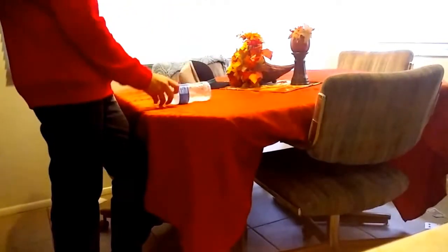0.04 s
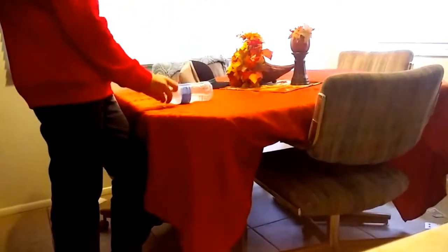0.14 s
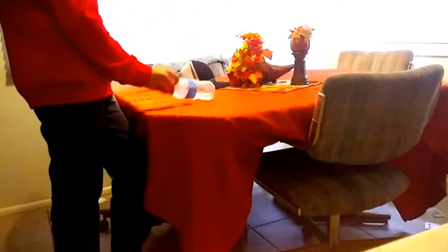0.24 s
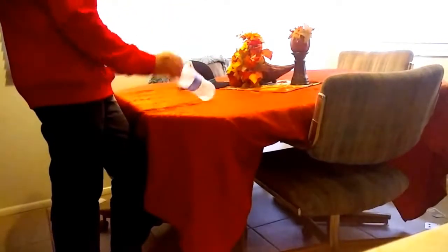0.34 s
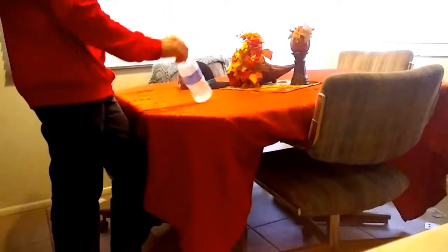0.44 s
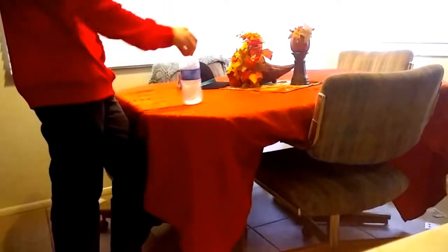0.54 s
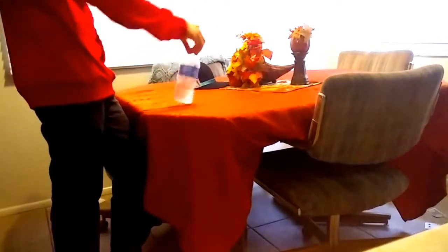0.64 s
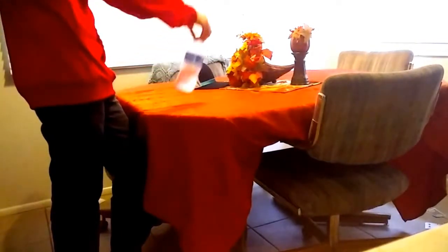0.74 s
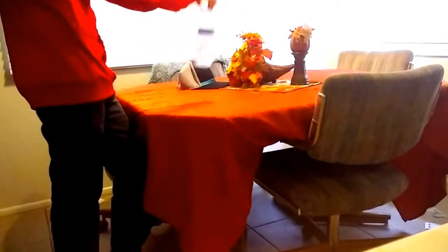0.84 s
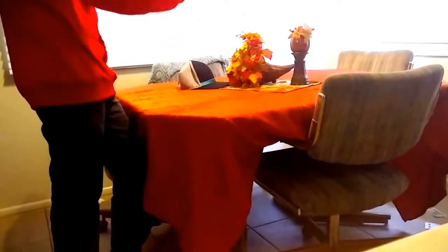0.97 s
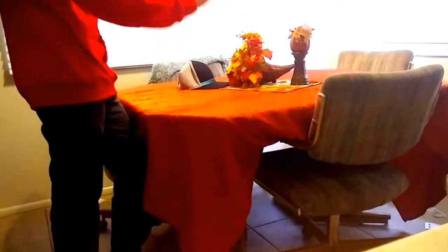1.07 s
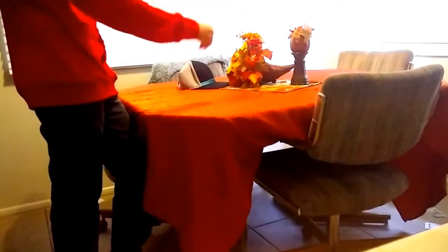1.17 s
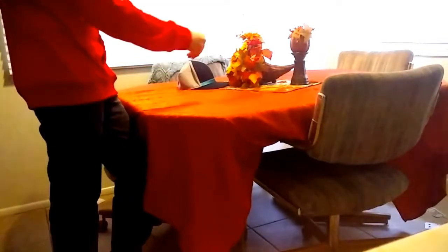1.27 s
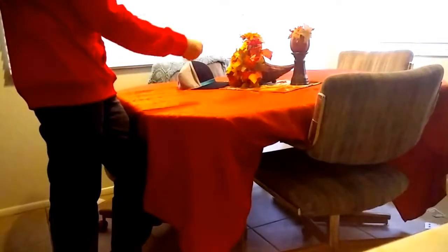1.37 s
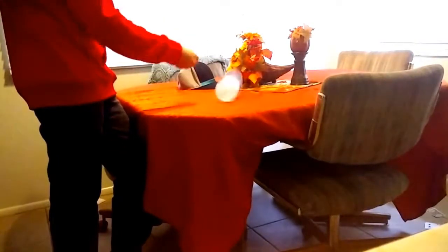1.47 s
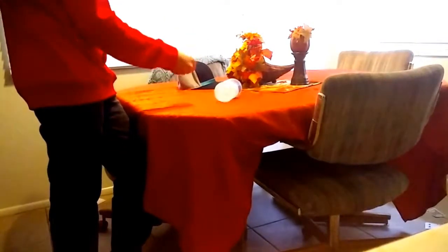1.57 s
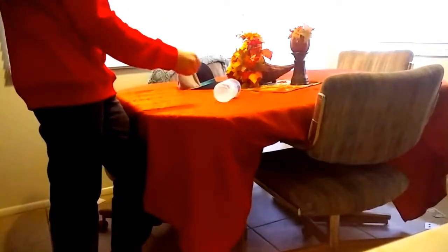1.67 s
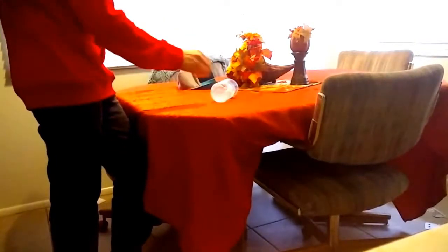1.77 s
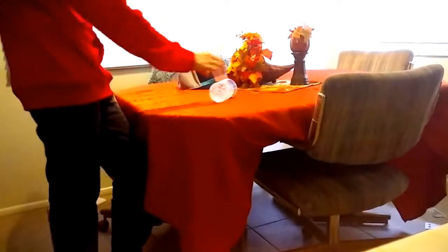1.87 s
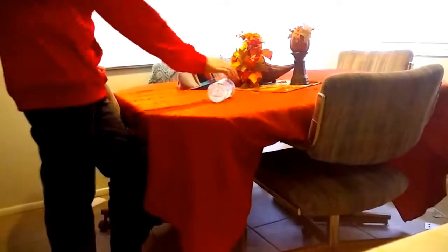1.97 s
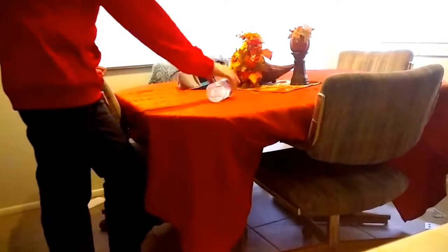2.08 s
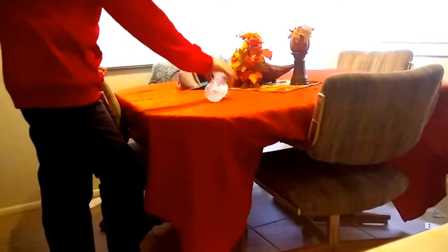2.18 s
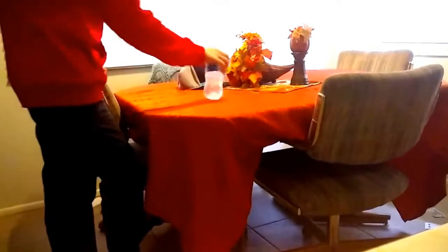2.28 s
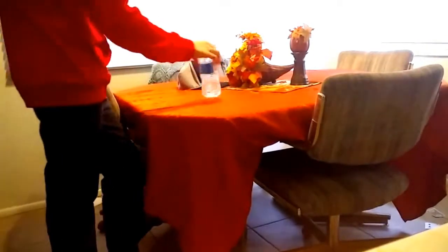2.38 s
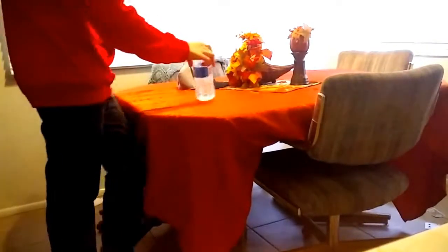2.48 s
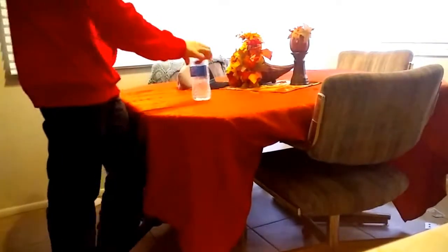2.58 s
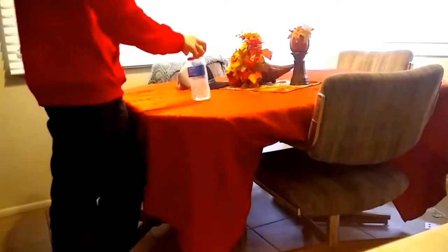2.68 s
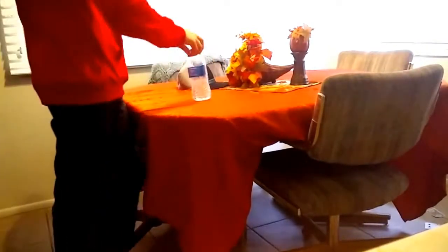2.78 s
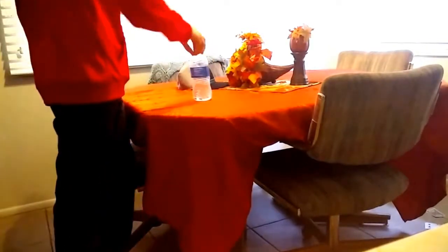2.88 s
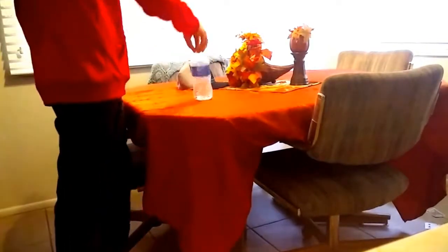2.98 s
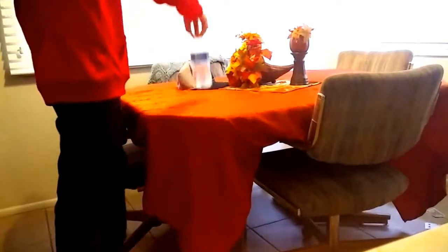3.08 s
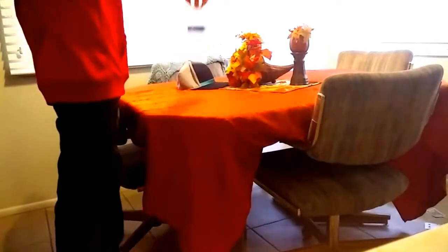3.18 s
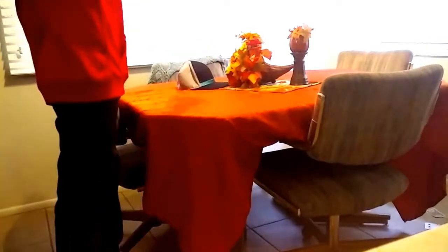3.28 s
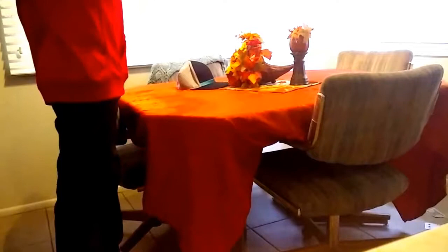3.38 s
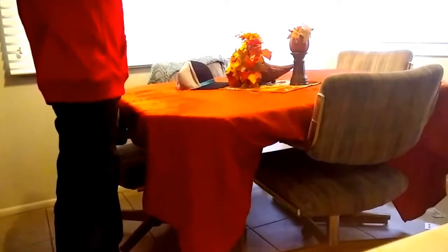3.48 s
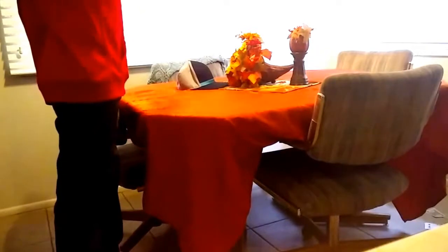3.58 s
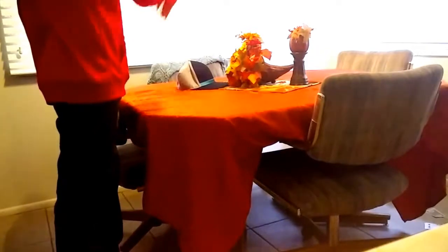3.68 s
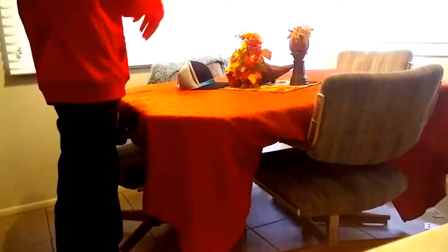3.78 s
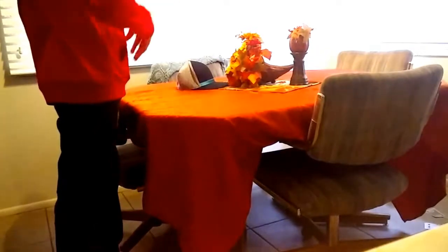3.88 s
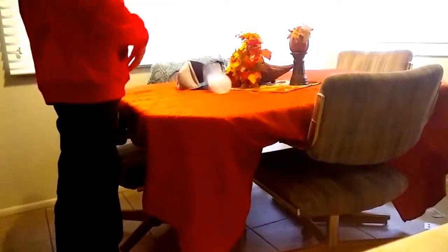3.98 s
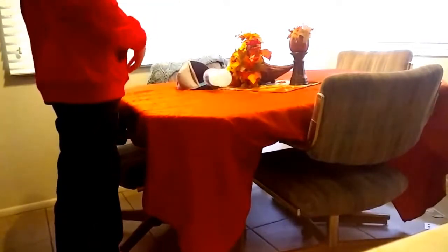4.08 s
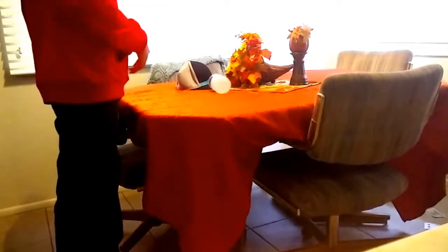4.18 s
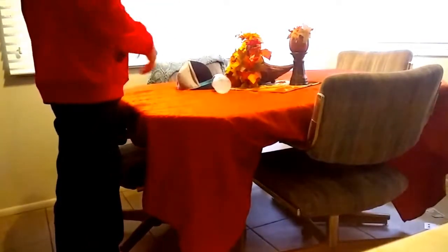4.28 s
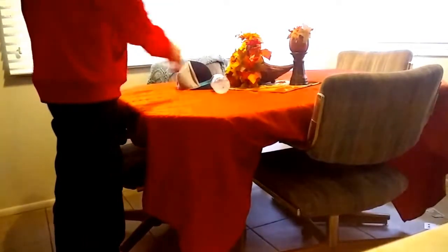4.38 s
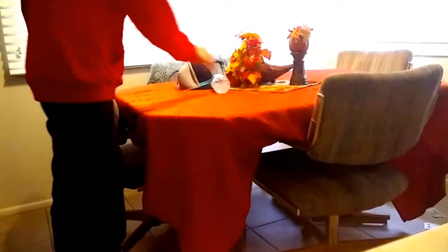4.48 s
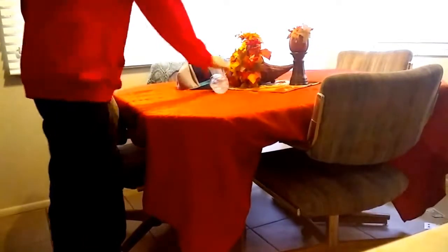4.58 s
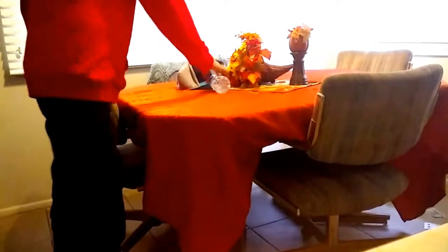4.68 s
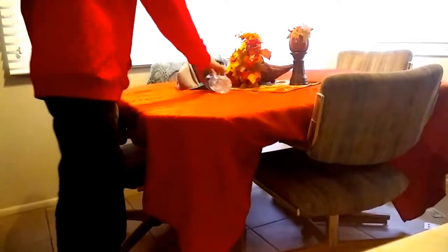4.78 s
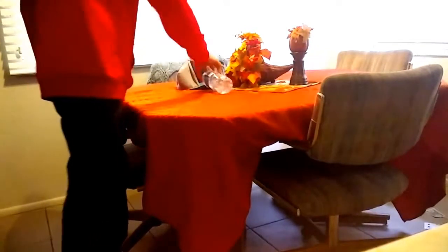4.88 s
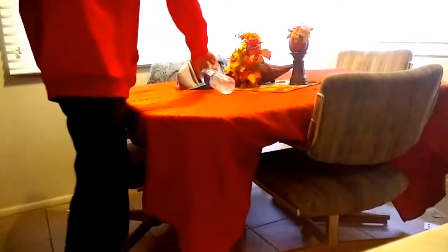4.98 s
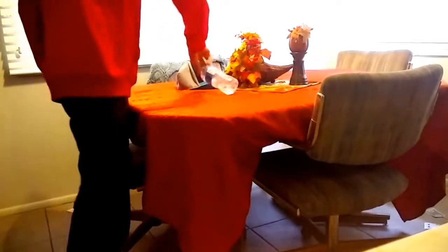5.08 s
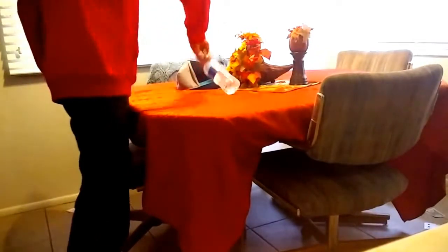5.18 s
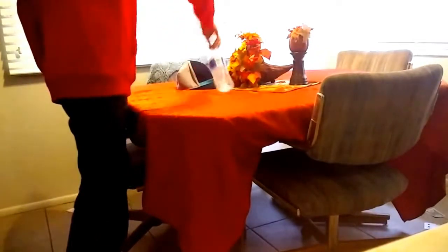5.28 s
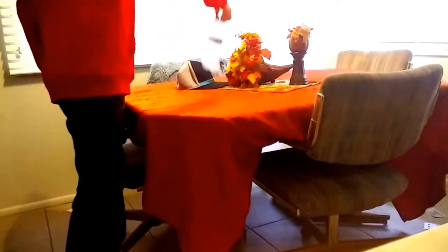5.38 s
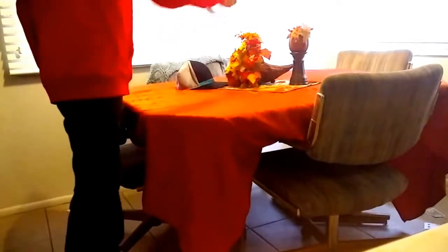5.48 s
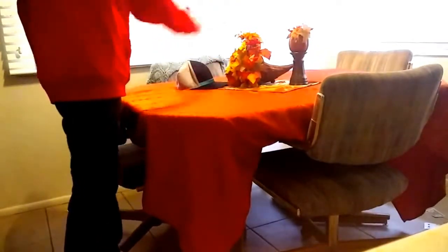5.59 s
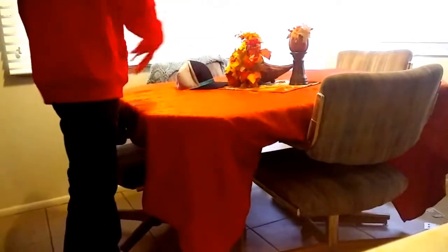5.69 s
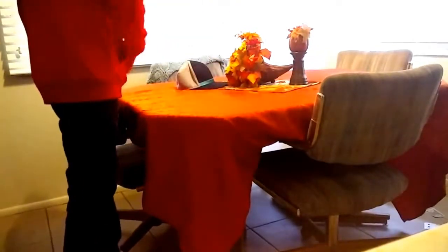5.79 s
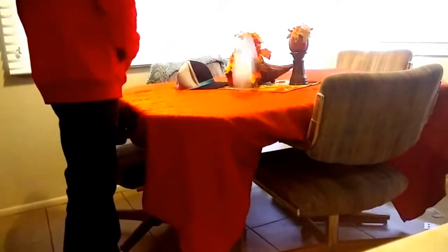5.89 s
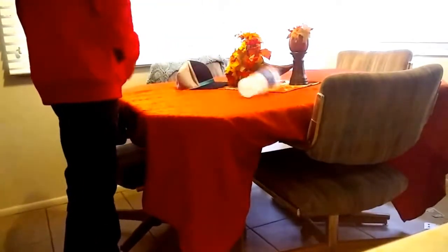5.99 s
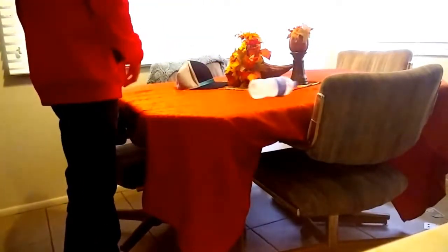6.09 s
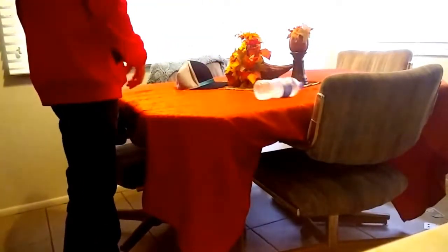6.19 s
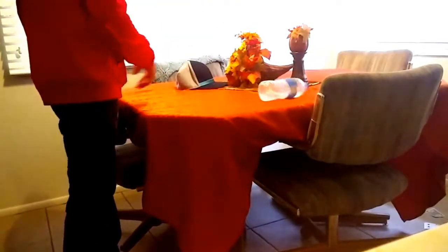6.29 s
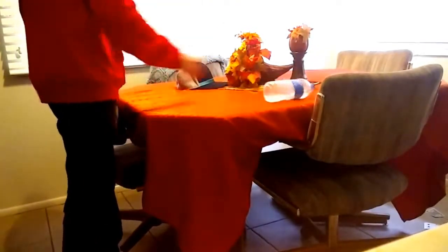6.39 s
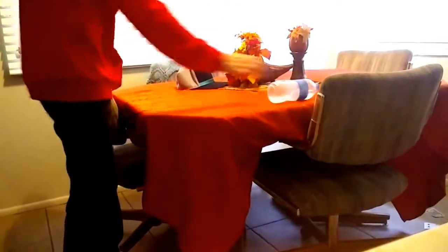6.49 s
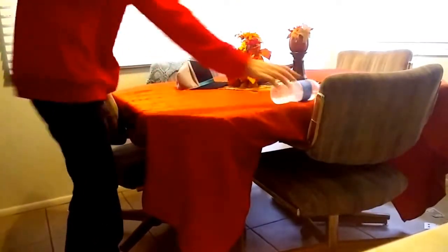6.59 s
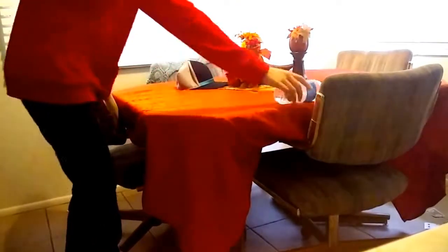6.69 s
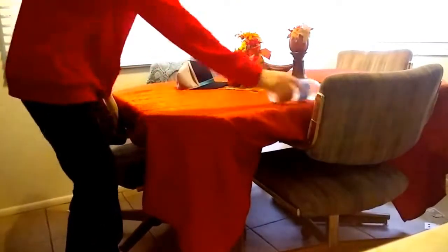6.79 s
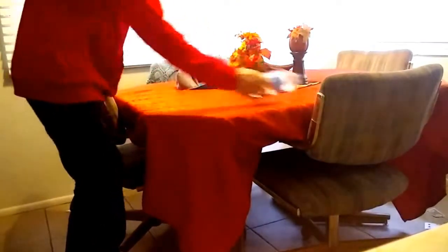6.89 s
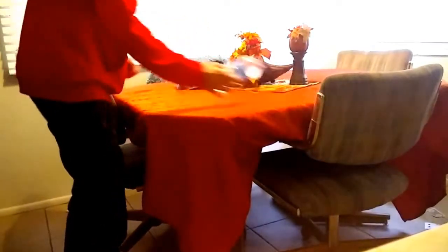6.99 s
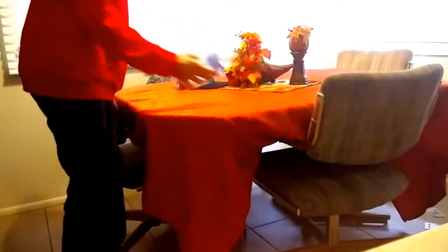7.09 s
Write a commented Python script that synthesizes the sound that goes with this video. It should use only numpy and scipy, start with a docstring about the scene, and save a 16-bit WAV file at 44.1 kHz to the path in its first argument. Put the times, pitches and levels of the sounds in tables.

```python
"""A soft knock over faint hum, hiss and ticking opens the scene in a lively room; then a part-filled
plastic bottle is flipped three times onto a cloth-covered table. Each strike filters a room response
and rings damped modes, the water slams after it as damped resonances, and the bottle topples over.
Between throws, runs of snaps crinkle the thin wall, the water glugs and uneven noise rustles a sleeve."""
import sys
import numpy as np
from scipy import signal
from scipy.fft import rfft, irfft
from scipy.io import wavfile
from scipy.ndimage import uniform_filter1d

SR = 44100
rng = np.random.default_rng(int(sys.argv[2]) if len(sys.argv) > 2 else 0)


def unload_wav(signal):
    """Save mono or channel-first audio to the path in sys.argv[1] as 16-bit WAV at rate SR, clipped to [-1, 1]."""
    wavfile.write(
        sys.argv[1],
        SR,
        np.round(np.clip(np.atleast_2d(signal).T, -1, 1) * 32767).astype(np.int16),
    )


N = 314874
TIME = np.arange(N) / SR
AGE = TIME[:SR]  # time since the start of one short sound, s


def amp(db):
    """Logarithmic level: converts decibels to amplitude gain."""
    return 10 ** (np.asarray(db) / 20)


def evened(x):
    """Power normalisation: scales to rms 1."""
    return x / np.sqrt(np.mean(x ** 2) + 1e-20)


def burst(x):
    """Energy normalisation: scales a short sound as if its energy were spread at rms 1 over 40 ms."""
    return x / np.sqrt(np.sum(x ** 2) / (.04 * SR) + 1e-20)


def read(points, hz):
    """Logarithmic pitch scale: interpolates a table along log frequency."""
    f, value = np.transpose(points)
    return np.interp(np.log(hz + 1), np.log(f + 1), value)


def add(mix, s, sound):
    """Superposition: mixes a sound in at time s."""
    part = mix[max(round(s * SR), 0):][:len(sound)]
    part += sound[:len(part)]


def colour(x, db_at, size=4096):
    """Minimum phase: a causal filter whose gain in dB is db_at(Hz)."""
    log_gain = np.log(amp(db_at(abs(np.fft.fftfreq(size, 1 / SR)))))
    spectrum = np.exp(np.conj(signal.hilbert(log_gain)))
    taps = np.fft.ifft(spectrum).real
    return signal.fftconvolve(x, taps[:size // 2])[:len(x)]


def low_cut(x, lowest_hz):
    """High-pass filter: steeply removes the bass below lowest_hz."""
    return colour(x, lambda hz: np.maximum(-10 * np.log10(1 + (lowest_hz / (hz + 1)) ** 8), -50))


def noise(spectrum):
    """Spectral shaping: steady random noise at rms 1 with the given spectrum."""
    gain = amp(read(spectrum, np.fft.rfftfreq(N, 1 / SR)))
    return evened(irfft(rfft(rng.standard_normal(N)) * gain, N))


def tones(lines):
    """Pure tones: sums steady sines whose levels are rms."""
    return sum(np.sqrt(2) * amp(db) * np.sin(2 * np.pi * (hz * TIME + rng.random()))
               for hz, db in lines)


def note(hz, t60, rise_s):
    """Damped resonance: one decaying sine with a soft start."""
    rise = 1 - np.exp(-AGE / rise_s)
    return burst(np.sin(2 * np.pi * hz * AGE) * amp(-60 * AGE / t60) * rise)


def swell(middle, half_length):
    """Gaussian envelope: a smooth rise and fall of gain."""
    return np.exp(-((TIME - middle) / half_length) ** 2)


# Reverberation time of the room: (f/Hz, t60/s)
REVERBERATION = [(70, .7), (150, 0.61), (300, 0.41), (1000, 0.47), (3000, 0.46), (6000, 0.41), (9000, 0.57),
                 (15000, 0.53)]


def room(direct_db, early_db, early_s, size=256):
    """Room impulse response: direct sound, sparse early reflections and a frequency-dependent tail."""
    hz, t, z = signal.stft(rng.choice([-1., 1.], SR), SR, nperseg=size)
    decay = amp(-60 * t / read(REVERBERATION, hz)[:, None])
    tail = signal.istft(z * decay, SR, nperseg=size)[1][:SR]
    reflections = rng.choice([-1., 1.], SR) * (rng.random(SR) < 5000 / SR)  # about 5000 per second
    early = burst(reflections * np.exp(-AGE / early_s))
    direct = burst(1. * (AGE == 0))
    return burst(tail) + amp(early_db) * early + amp(direct_db) * direct


def echoing(x, wet_db):
    """Reverberation by convolution: a short sound together with its room response."""
    wet = signal.fftconvolve(x, room(direct_db=-19.0, early_db=-4.0, early_s=.02))[:SR]
    return x + amp(wet_db) * burst(wet)


WHINE_UNTIL_S = 1.8  # the electrical whine and part of the hiss hold until here, then fade


def fading(db_per_s):
    """Exponential decay: gain of the electrical noise, which holds and then dies away."""
    return amp(-db_per_s * np.maximum(TIME - WHINE_UNTIL_S, 0))


def drone(db=-67, hz=232, width_hz=22, swell_db=3, size=6000):
    """Narrow-band noise: a low hollow drone that wavers in level."""
    band = evened(colour(rng.standard_normal(N), lambda f: -20 * np.log10(1 + ((f - hz) / width_hz) ** 2)))
    waver = evened(uniform_filter1d(rng.standard_normal(N), size))
    return amp(db) * evened(band * amp(swell_db * waver))


# Spectrum of the room air: (f/Hz, relative level per Hz/dB)
AIR_SPECTRUM = [(25, -34.5), (45, -24.5), (70, -12), (140, -16), (200, -10), (260, -8.5), (380, -12),
                (500, -12.5), (900, -17), (1500, -23.5), (3000, -26.5), (6000, -35), (12000, -42.5),
                (15800, -36.5)]
# Spectrum of the microphone hiss: (f/Hz, relative level per Hz/dB)
HISS_SPECTRUM = [(2000, -23.5), (5000, -3), (7500, 0), (10000, 4), (12000, -4), (15500, -4)]
# Appliance hum: (f/Hz, rms level/dB)
HUM_LINES = [(60, -84), (119.5, -75.5), (179, -76.5), (479, -81.5), (1001, -84.5), (2002, -84.5)]
# Thin electrical tones, before they fade: (f/Hz, rms level/dB)
WHINE_LINES = [(7000, -92.5), (8000, -92.5), (9001, -87), (10002, -88.5), (13001, -87.5), (14002, -91.5),
               (14998, -93.5)]


def background(air_db=-63, hiss_db=-85, whine_hiss_db=-77):
    """Stationary noise and line spectra: room air and hum, with the microphone's hiss and whine."""
    air = amp(air_db) * noise(AIR_SPECTRUM) + tones(HUM_LINES) + drone()
    hiss_gain = amp(hiss_db) + amp(whine_hiss_db) * fading(db_per_s=50)
    hiss = hiss_gain * noise(HISS_SPECTRUM)
    return air + hiss + fading(db_per_s=4.5) * tones(WHINE_LINES)


def ticking(db=-69, until_s=2.2):
    """Periodic gating: treble noise opens briefly every 80 ms as faint electrical ticks."""
    since_tick = (TIME - .019 + .04) % .08 - .04  # seconds to or from the nearest tick
    pulse = np.exp(-(since_tick / .0015) ** 2)
    treble = noise([(3000, -40), (9000, 11), (15000, 5)])
    return amp(db) * pulse * (TIME < until_s) * treble


# Spectrum of rubbing cloth: (f/Hz, relative level per Hz/dB)
RUB_SPECTRUM = [(100, -28), (400, 6), (1500, -3), (3000, -5.5), (5000, -17), (7500, -15.5), (11000, -30),
                (16000, -31)]
# Spectrum of the high swish of cloth: (f/Hz, relative level per Hz/dB)
SWISH_SPECTRUM = [(1500, -20), (5500, -8), (7500, 3), (10000, -3.5), (12000, -14), (16000, -4.5)]
# Arm movements, each a swell of sleeve and tablecloth:
# (middle t/s, half length/s, rub level/dB, high swish level/dB)
ARM_STROKES = [(0.24, 0.19, -65, -66), (2.41, 0.23, -63.5, -83), (2.757, 0.043, -71, -70),
               (4.85, 0.11, -75, -86), (5.31, 0.028, -71, -74.5), (5.45, 0.052, -62, -68.5),
               (5.773, 0.065, -66.5, -70.5), (6.795, 0.061, -64, -75.5), (7.092, .08, -63.5, -70)]


def rustle(grain_db=3, size=500):
    """Friction noise: cloth rubs in uneven little catches as the arm moves."""
    catches = amp(grain_db * evened(uniform_filter1d(rng.standard_normal(N), size)))
    rub = evened(noise(RUB_SPECTRUM) * catches)
    swish = evened(noise(SWISH_SPECTRUM) * catches)
    return sum(swell(s, half_length) * (amp(rub_db) * rub + amp(swish_db) * swish)
               for s, half_length, rub_db, swish_db in ARM_STROKES)


# Colour of the plastic shell: (f/Hz, gain/dB)
SHELL_COLOUR = [(60, -16.5), (250, 5), (3000, -4.5), (6500, -12), (8500, -20.5), (15000, -32)]
# Resonances of the thin wall: (f/Hz, width/Hz, lift/dB)
WALL_RESONANCES = [(980, 660, 4.5), (2800, 880, 7.5), (6700, 2600, 8)]


def wall(hz):
    """Plate resonance: gain in dB of the thin wall with its peaks."""
    peaks = sum(lift_db / (1 + (2 * (hz - peak_hz) / width_hz) ** 2)
                for peak_hz, width_hz, lift_db in WALL_RESONANCES)
    return read(SHELL_COLOUR, hz) + peaks


# While the hand holds the bottle, its wall ticks faintly at random: (from t/s, until t/s)
HAND_GRIPS = [(2.2, 2.55), (6.751, 7.1)]
TICK_COUNT, TICK_DB, TICK_S = 4, -72.5, .002  # per grip, relative level, length
TICK_HZ, TICK_SPREAD_OCTAVES, TICK_REACH_OCTAVES = 4370, 0.79, 0.32


def grip_ticks():
    """Random excitation: tiny crinkles scattered over each grip, as rows like those of WALL_CRINKLES."""
    rows = []
    for start, end in HAND_GRIPS:
        for k in range(TICK_COUNT):
            s = start + (end - start) * (k + rng.random()) / TICK_COUNT
            hz = TICK_HZ * 2 ** (TICK_SPREAD_OCTAVES * rng.uniform(-0.77, 1))
            rows.append((s, TICK_DB, hz, TICK_REACH_OCTAVES, TICK_S))
    return rows


# Thin plastic flexing and being handled:
# (t/s, relative level/dB, centre f of the flexing patch/Hz, its reach/octaves, length scale/s)
WALL_CRINKLES = [(0.458, -59, 3440, 0.37, 0.0023), (1.184, -55, 2800, 0.24, 0.017),
                 (1.19, -51, 980, 0.4, 0.01), (1.485, -63, 2200, 0.11, .035),
                 (2.307, -60.5, 1140, 0.47, 0.014), (2.508, -60.5, 2680, 0.35, 0.02),
                 (2.666, -61, 2380, 0.2, .005), (5.409, -49.5, 850, 0.28, 0.029),
                 (5.711, -51, 2800, 0.32, 0.026), (5.827, -41.5, 2260, 0.68, 0.0026),
                 (5.722, -63.5, 6590, .25, 0.053), (5.856, -50, 4760, 0.42, 0.015),
                 (6.791, -58, 790, 0.81, 0.023), (6.97, -55.5, 2540, 0.38, .0062),
                 (7.112, -56.5, 1800, 1.8, .025)]


def crinkles(snaps_per_s=900, skirt_db=-24, first_snap=3.1, build_up=0.67):
    """Impulsive buckling: a run of tiny snaps builds up and fades, ringing one patch of the thin wall."""
    out = np.zeros(N)
    for s, db, centre_hz, octaves, length in list(WALL_CRINKLES) + grip_ticks():
        envelope = np.exp(-(AGE / length - build_up) ** 2 / 2)  # peaks after build_up lengths
        run = rng.standard_normal(SR) * (rng.random(SR) < snaps_per_s / SR) * envelope
        run[0] = first_snap
        heard = signal.fftconvolve(run, room(direct_db=-13.5, early_db=-0.5, early_s=0.021))[:SR]

        def patch(hz):
            distance = abs(np.log2((hz + 1) / centre_hz) / octaves)
            return np.maximum(-10 * np.log10(1 + distance ** 2.7), skirt_db) + wall(hz)

        add(out, s, amp(db) * burst(colour(heard, patch)))
    return out


# At each landing the table top flexes under the bottle's weight: (t/s, relative level/dB)
TABLE_HEAVES = [(1.619, -51), (4.122, -34.5), (6.07, -45.5)]
# After each landing the water rocks to and fro, settling,
# and its pitch sinks towards the bottle's low resonance.
SLOSH_PERIOD_S, SLOSH_COUNT = .11, 12
SLOSH_DB, SETTLE_DB_PER_S, SLOSH_SPREAD_DB = -55, 16, 1.5
SLOSH_HZ, SLOSH_RISE, SLOSH_SINK_S, SLOSH_T60_S = 242, 0.54, .35, 0.06  # rise: a share of SLOSH_HZ


def sloshes():
    """Damped sloshing: glugs that weaken on average after each landing, as rows like those of WATER_GLUGS."""
    rows = []
    for landed, _ in TABLE_HEAVES:
        for k in range(1, SLOSH_COUNT + 1):
            age = (k + rng.random()) * SLOSH_PERIOD_S
            db = SLOSH_DB - SETTLE_DB_PER_S * age + SLOSH_SPREAD_DB * rng.standard_normal()
            hz = SLOSH_HZ * (1 + SLOSH_RISE * np.exp(-age / SLOSH_SINK_S))
            rows.append((landed + age, db, hz, SLOSH_T60_S))
    return rows


# Water slamming into the end of the bottle, and its clearest glugs:
# (t/s, relative level/dB, f/Hz, t60/s)
WATER_GLUGS = [(.235, -57, 240, 0.045), (.358, -57, 205, 0.038), (.699, -60.5, 321, 0.039),
               (1.599, -18.5, 239, 0.11), (1.613, -19.5, 245, 0.059), (1.618, -27.5, 519, 0.054),
               (2.651, -52, 253, 0.11), (2.70, -55.5, 349, 0.1), (4.134, -19.5, 236, 0.12),
               (5.736, -55, 233, 0.23), (6.072, -38, 224, .08), (6.19, -34.5, 363, 0.14),
               (6.205, -41, 287, 0.064), (6.40, -53, 305, .11), (6.46, -59.5, 290, 0.26)]


def water(lowest_hz=175):
    """Cavity resonance: water thumps the bottle's low resonances, and the room prolongs them."""
    out = np.zeros(N)
    for s, db, hz, t60 in list(WATER_GLUGS) + sloshes():
        add(out, s, amp(db) * echoing(note(hz, t60, rise_s=0.0027), wet_db=-7.5))
    return low_cut(out, lowest_hz)


# Lowest modes of the table top: (f/Hz, relative level/dB)
TABLE_MODES = [(74, -1), (96, -2.5), (150, 1)]


def table(t60=0.27, lowest_hz=62):
    """Plate bending modes: the slow boom of the whole table top."""
    out = np.zeros(N)
    boom = sum(amp(db) * note(hz, t60, rise_s=.012) for hz, db in TABLE_MODES)
    for s, db in TABLE_HEAVES:
        add(out, s, amp(db) * boom)
    return low_cut(out, lowest_hz)


# Bottle meets table, from a hard landing to a gentle setting down:
# (t/s, relative level/dB, brightness/dB per octave, resonance f of the struck spot/Hz,
#  its width as a share of that f, resonant level against the unresonant part/dB)
BOTTLE_BLOWS = [(0, -43.5, 0.1, 730, 0.26, 5.5), (1.5792, -21.5, 0.2, 875, 0.072, 7),
                (1.602, -22.5, 0.5, 514, 0.053, 7.5), (1.621, -28.5, 1, 563, 0.072, 11),
                (2.668, -49, -4.5, 704, 0.28, 13), (2.692, -49.5, -4, 577, 0.18, 11),
                (4.117, -15.5, 1.5, 997, 0.046, 8.5), (4.137, -15.5, 2.1, 2500, 0.065, 4),
                (4.157, -23.5, -3, 677, .1, 13), (4.3211, -31, 2, 3180, 0.16, 9.5),
                (4.323, -32, -0.3, 953, .07, 14), (4.332, -34, -.3, 1520, 0.18, 18),
                (6.063, -26, 0, 2190, 0.092, 2), (6.072, -23.5, 1, 425, 0.047, 18.5),
                (6.1619, -26, 2, 3240, 0.25, 2), (6.178, -32, -1, 1220, 0.23, 14)]


def snaps(snap_db=-25, per_brightness_db=3.0, fade_s=0.00083, centre_hz=5800, slope_db=22, delay_s=0.0012):
    """Shell buckling: a brief bright crack just after each blow starts, heard without the room."""
    def band(hz):
        return read(SHELL_COLOUR, hz) - np.minimum(slope_db * np.log2((hz + 1) / centre_hz) ** 2, 40)

    out = np.zeros(N)
    for s, db, brightness, *_ in BOTTLE_BLOWS:
        crack = rng.standard_normal(SR) * np.exp(-AGE / fade_s)
        level = amp(db + snap_db + per_brightness_db * brightness)
        add(out, s + delay_s, level * burst(colour(crack, band)))
    return out


# Ring of bottle and table top: (f/Hz, relative level/dB, t60/s)
RING_MODES = [(174.7, -7, .35), (233.4, -2, .35), (252, 3.5, 0.076), (334.2, -3, 0.36), (363, -8, 0.64),
              (425, -1, 0.38), (557, -1, 0.39), (665, -3, 0.27), (777, -9, 0.26), (851, -3, 0.25),
              (949, -5, 0.22), (1040, -9.5, .28), (1127, -11.5, .25), (1250, -7.5, .2), (1370, -4.5, 0.16),
              (1431, -8.5, .3), (1510, -12.5, 0.49), (2083, -13.5, 0.26), (2350, -12.5, 0.35),
              (2580, -11.5, 0.13), (2900, -14, .25), (3810, -17, 0.53), (4250, -20, 0.093),
              (4980, -18, .25)]


def ring(weights, rise_s=0.0068):
    """Modal synthesis: modes of bottle and table swell briefly and die away."""
    hz, db, t60 = np.transpose(RING_MODES)[:, :, None]
    waves = np.sin(2 * np.pi * (hz * AGE + rng.random(hz.shape)))
    gains = amp(db + read(weights, hz) - 60 * AGE / t60)
    return (gains * waves).sum(0) * (1 - np.exp(-AGE / rise_s))


# Colour of a blow: (f/Hz, gain/dB)
IMPACT_COLOUR = [(30, -45), (48, -27.5), (66, -10.5), (130, -7.5), (230, -0.5), (400, -2), (950, -2.5),
                 (1500, -5.5), (2600, -10), (3700, -14), (5500, -15.5), (6600, -21), (7800, -37.5),
                 (10500, -47), (15000, -62.5)]
TILT_LOW_HZ, TILT_HIGH_HZ = 200, 4500  # brightness tilts the colour between these


def landings(ring_db=-7, knock_db=-1, ring_tilt=0.47, rise_s=0.0015):
    """Impact excitation: each blow has its own brightness and the resonance of the part that hits."""
    out = np.zeros(N)
    cushion = 1 - np.exp(-AGE / rise_s)  # the cloth softens the attack
    for s, db, brightness, spot_hz, spot_share, lift_db in BOTTLE_BLOWS:
        tilt_db = brightness * np.log2(TILT_HIGH_HZ / TILT_LOW_HZ)
        weights = [(TILT_LOW_HZ, 0), (TILT_HIGH_HZ, tilt_db)]
        ring_weights = [(TILT_LOW_HZ, 0), (TILT_HIGH_HZ, ring_tilt * tilt_db)]

        def blow_colour(hz):
            offset = (hz / spot_hz - 1) / spot_share
            spot = 10 * np.log10(1 + amp(lift_db) ** 2 / (1 + offset ** 2) ** 2)
            return read(IMPACT_COLOUR, hz) + read(weights, hz) + spot

        click = cushion * room(direct_db=-20, early_db=1.5, early_s=0.039)
        knock = amp(knock_db) * burst(colour(click, blow_colour))
        ringing = amp(ring_db) * burst(ring(ring_weights))
        add(out, s, amp(db) * (knock + ringing))
    return out


def scene():
    """Superposition: all sources summed at one microphone."""
    surroundings = background() + ticking() + rustle()
    bottle = crinkles() + water() + table() + snaps() + landings()
    return (surroundings + bottle)[None]


def record(dry, edge_hz=15900):
    """Band limitation: the recorder's low-pass filter."""
    taps = signal.firwin(511, edge_hz, window=("kaiser", 9), fs=SR)
    return signal.oaconvolve(dry, taps[None], "same")


dry = scene()
out = record(dry)
unload_wav(out)
```